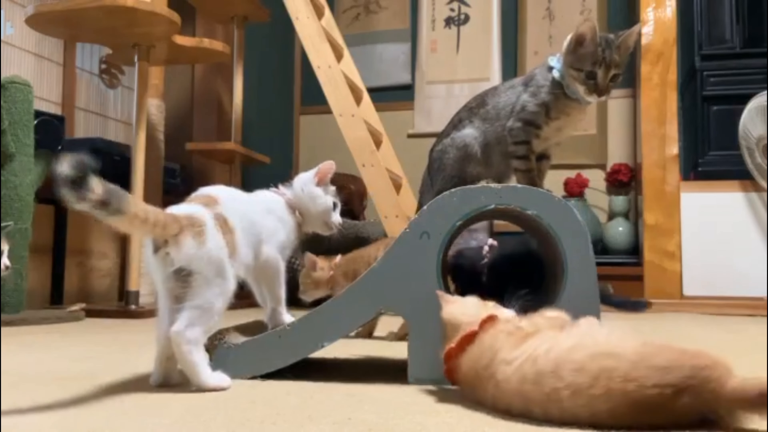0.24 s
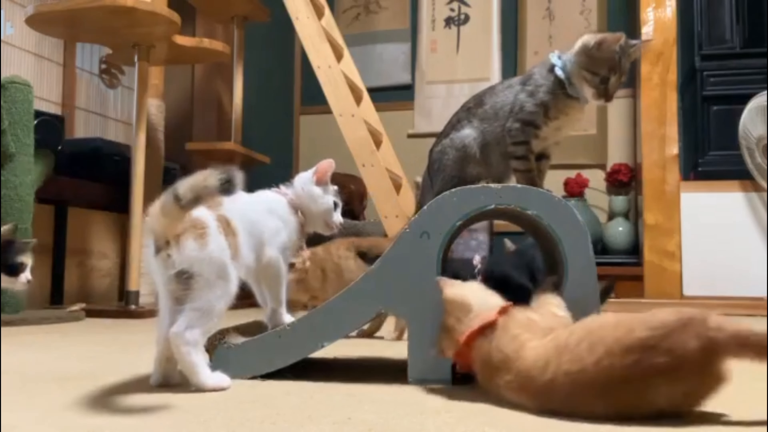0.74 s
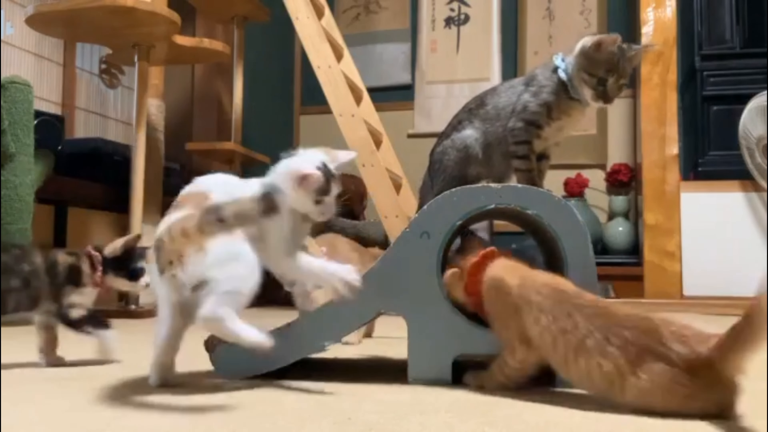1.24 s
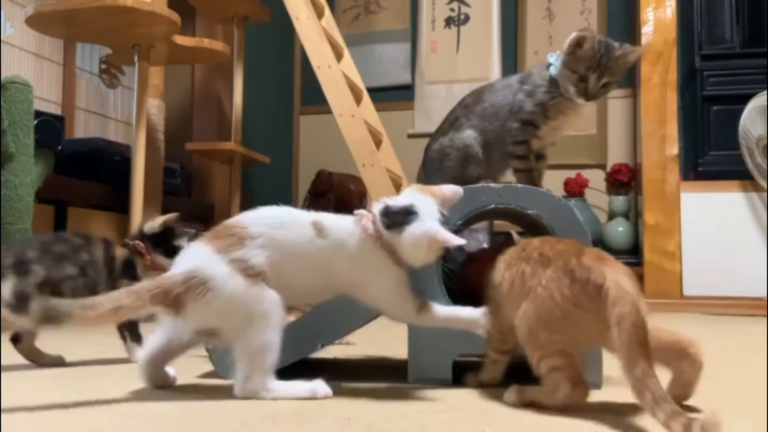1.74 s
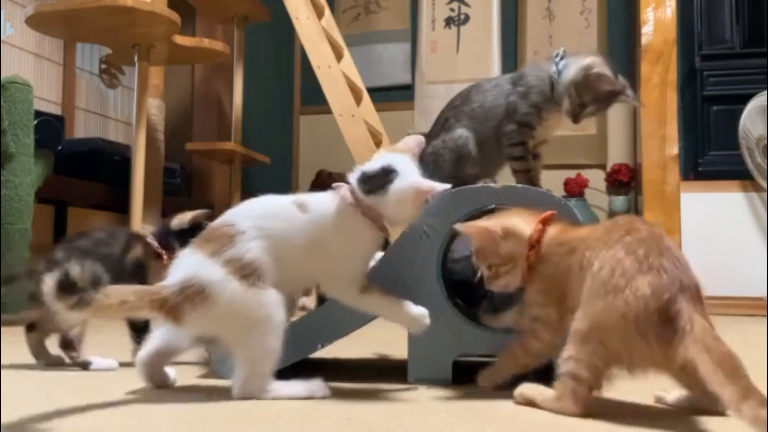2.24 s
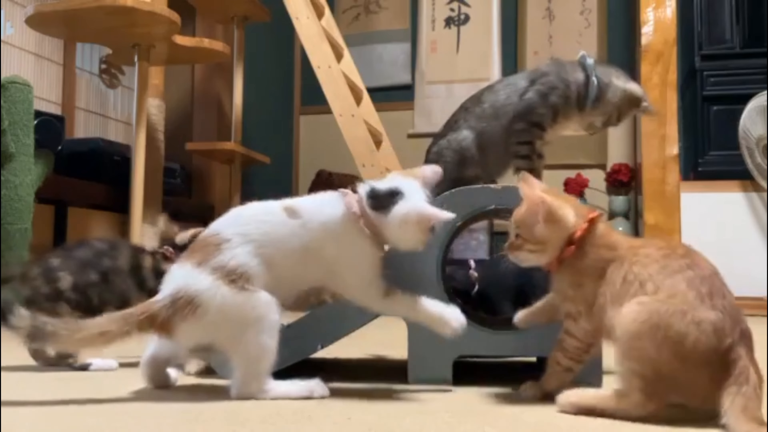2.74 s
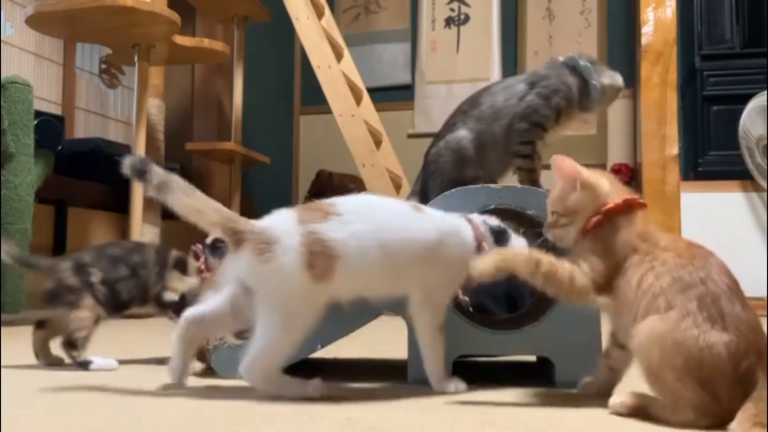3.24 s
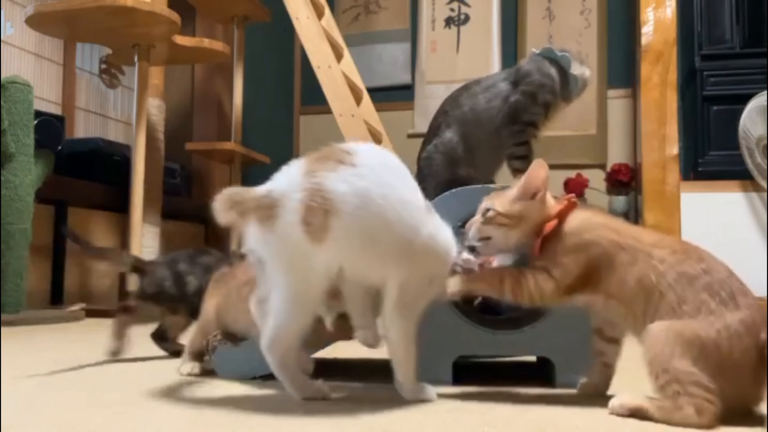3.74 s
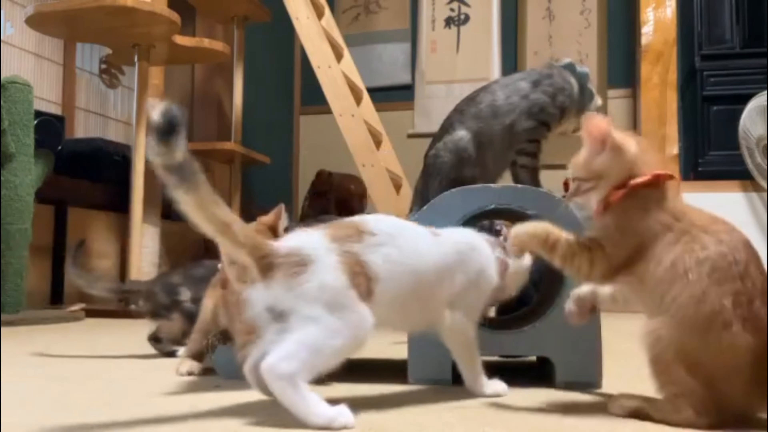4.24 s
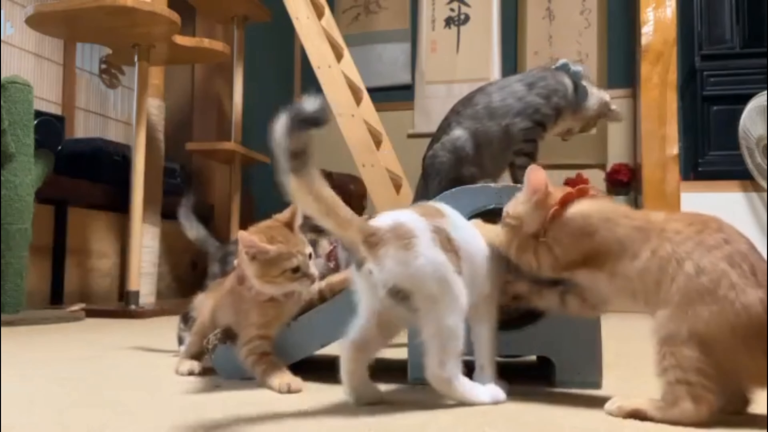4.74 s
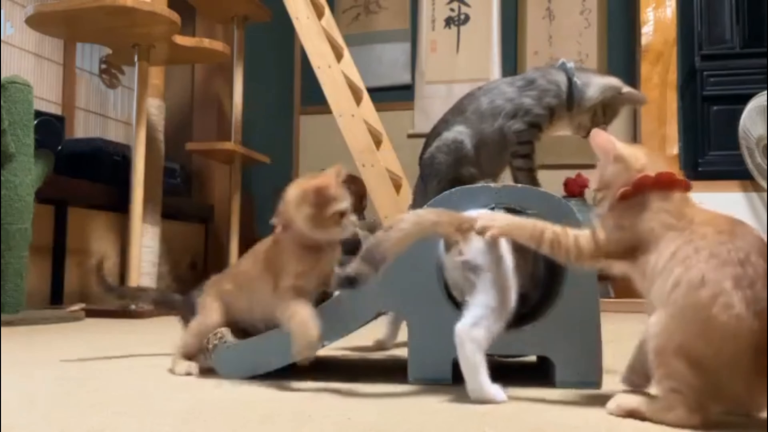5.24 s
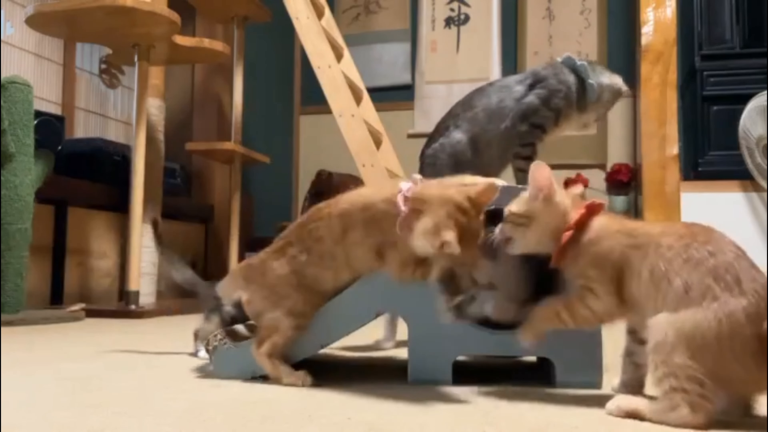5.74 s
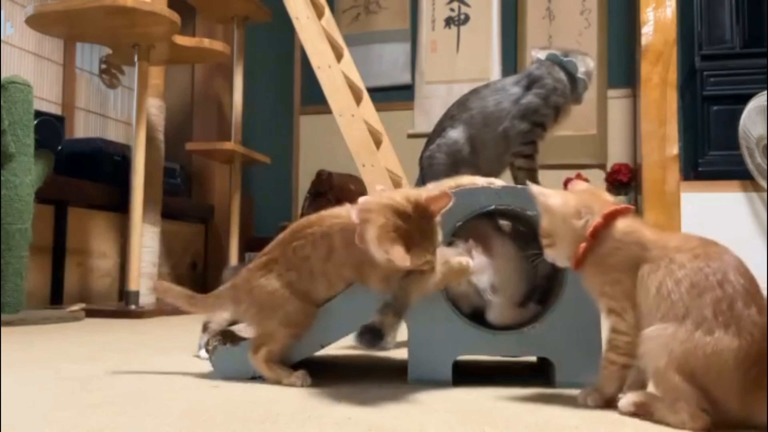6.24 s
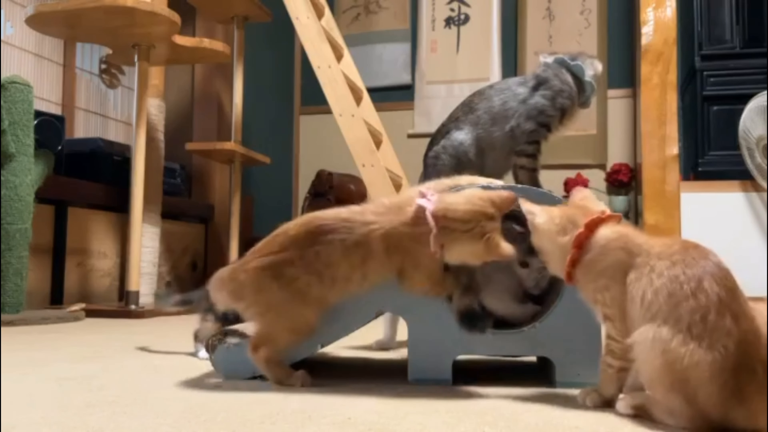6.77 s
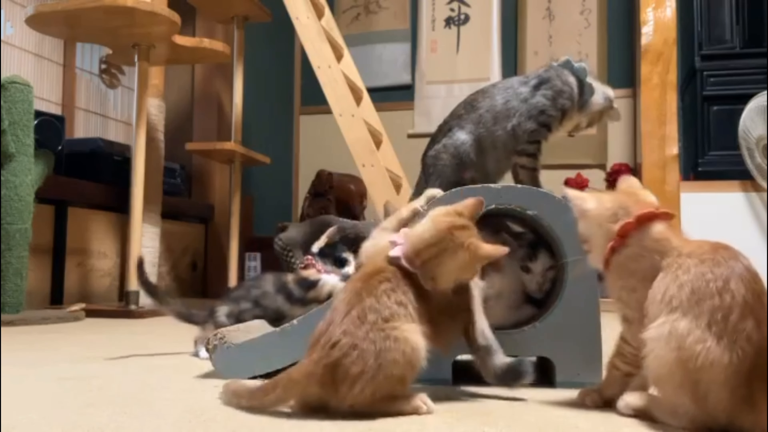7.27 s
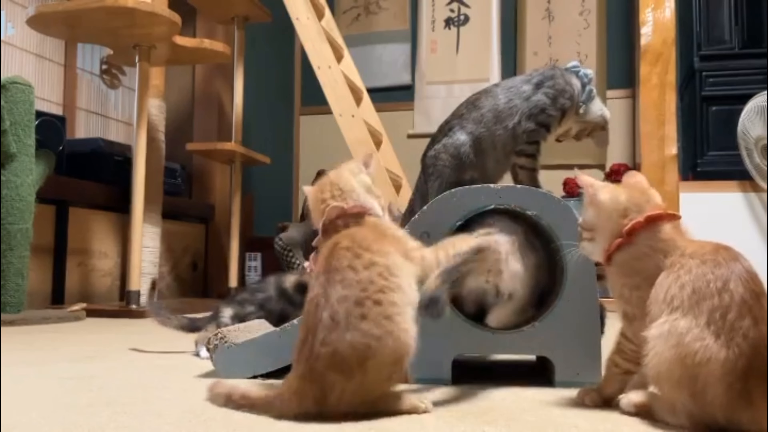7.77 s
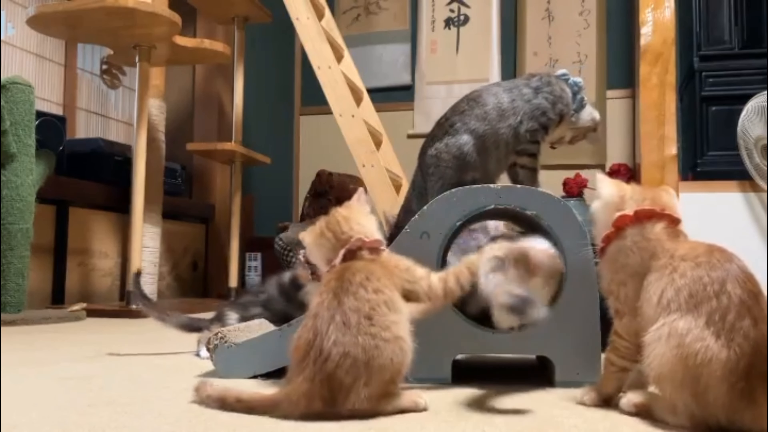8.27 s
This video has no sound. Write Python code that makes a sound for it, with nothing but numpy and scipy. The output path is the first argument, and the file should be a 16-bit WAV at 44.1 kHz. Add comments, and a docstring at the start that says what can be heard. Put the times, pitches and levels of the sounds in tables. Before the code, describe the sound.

In a small, quiet room with a matted floor, kittens tussle around a board tunnel. Light pats quicken into thumps, then a loud dry knock with a claw crack at 1.3 seconds stands far above the rest. Scattered pad thuds, toe raps and brief scuffs follow, busiest again just after five seconds, then thin out to a sharp click at the end. Close single-channel pickup, short room reverberation, faint whir.

```python
"""A small, quiet room with a matted floor: kittens wrestle around a board play tunnel, heard in one channel.
Paws and falling bodies send short falling chirps through the floor; hard knocks ring the damped tunnel board.
Claws crack in shaped noise bursts, toes rap and patter as filtered taps, pads scrape with a hoarse note.
Fur and pads scuff as uneven friction noise. Diffuse reverberation lies below the direct sound,
with a faint steady whir of coloured noise underneath."""
import sys
import numpy as np
from scipy import signal
from scipy.fft import rfft, irfft
from scipy.io import wavfile

SR = 44100
rng = np.random.default_rng(int(sys.argv[2]) if len(sys.argv) > 2 else 0)


def transcribe(u):
    """Save the signal u as a 16-bit wav file named by the first command-line argument.

    u: samples, shape (n,) or (channels, n), limited to [-1, 1]; the rate is SR.
    q: integer samples, one column per channel.
    """
    v = np.clip(np.atleast_2d(u).T, -1, 1)
    q = np.round(v * 32767).astype(np.int16)
    wavfile.write(sys.argv[1], SR, q)


N = 375291  # samples in the scene

# Spectrum of the steady whir: pitch_hz, level_db (relative, per Hz)
WHIR_SPECTRUM = [(35, -53.5), (60, -1), (125, -4.5), (160, 4.5), (205, -9), (500, -13.5), (1100, -24),
                 (1560, -13), (1700, -4), (1830, -14.5), (2050, -12), (3200, -30), (6800, -31.5),
                 (8500, -39.5)]
# Fur brushing along the tunnel in soft swishes: peak_s, length_s, level_db
FUR_SWISHES = [(.05, 0.1, -70.5), (.295, 0.027, -49), (.673, .02, -54.5), (1.06, 0.19, -63),
               (1.325, 0.038, -46), (2.0, 0.21, -69), (3.0, .11, -80.5), (3.36, 0.43, -80),
               (3.59, 0.073, -67), (3.82, 0.059, -65), (4.255, 0.048, -71), (4.52, 0.33, -72),
               (4.84, 0.1, -64.5), (5.36, 0.41, -63.5), (5.88, 0.11, -75.5), (6.14, 0.12, -67.5),
               (6.72, 0.15, -72), (7.215, 0.075, -64.5), (7.45, 0.29, -78), (8.02, 0.57, -75)]
# Scuffing strokes of pads over the mat: peak_s, length_s, level_db
PAD_SCUFFS = [(0.292, 0.1, -57.5), (0.673, 0.022, -55.5), (1.41, 0.069, -50.5), (1.752, 0.025, -57),
              (1.887, 0.077, -58), (2.038, 0.09, -54), (2.347, 0.031, -58), (2.663, 0.05, -50),
              (2.759, 0.051, -61.5), (3.806, 0.054, -62.5), (5.083, 0.13, -53.5), (5.445, 0.17, -52.5),
              (6.771, 0.35, -58), (6.998, 0.096, -59), (7.672, 0.14, -66.5), (8.438, 0.071, -51)]
# Spectrum of fur on board: pitch_hz, level_db
FUR_SPECTRUM = [(2500, -1), (5500, -4), (6700, 1), (8200, -11.5), (13000, -7.5), (16000, -17.5)]
# Spectrum of pads rubbing on the mat: pitch_hz, level_db
RUB_SPECTRUM = [(100, -3), (350, 4), (2400, -1), (3500, -21), (7000, -74)]
# Pads scraping over the board: middle_s, length_s, level_db, pitch_hz
PAD_SCRAPES = [(0.069, 0.038, -60.5, 2300), (1.403, 0.0066, -32, 1366), (1.866, 0.019, -54, 1300),
               (1.992, 0.01, -57.5, 4400), (2.013, 0.008, -54, 2060), (2.343, 0.0073, -56, 1170),
               (4.0, 0.0075, -57, 2120), (4.286, 0.027, -53.5, 1393), (4.746, 0.017, -54.5, 930),
               (6.766, 0.0072, -45, 1890), (7.093, 0.0097, -50.5, 1480), (7.214, 0.028, -49, 1480),
               (8.057, 0.0082, -56.5, 1900), (8.207, 0.019, -52, 1600)]
# Claws catching on the board: start_s, level_db (peak)
CLAW_CATCHES = [(.174, -42.5), (.287, -38), (0.657, -46), (0.681, -39), (1.3056, -18.5), (1.331, -22.5),
                (2.092, -35), (2.648, -46), (3.556, -48.5), (3.96, -47), (4.3929, -28.5), (5.064, -38.5),
                (5.193, -43.5), (5.428, -37.5), (6.336, -45), (6.848, -46), (6.971, -40), (8.452, -28.5),
                (8.487, -43)]
# Spectrum of a claw's crack: pitch_hz, level_db
CLAW_SPECTRUM = [(500, -18), (1500, 6.5), (2500, -2.5), (5000, -3), (6600, -6.5), (8000, -16),
                 (15000, -19.5)]
# Paws landing on the floor, along with the low thud of the big tunnel knock at 1.312 s: attack_s (arrival of
# the chirp's top), level_db (relative), hardness_hz (of the contact)
PAW_LANDINGS = [(0.176, -36, 1690), (0.257, -38.5, 920), (0.284, -42, 398), (0.541, -43.5, 824),
                (0.671, -38, 563), (0.764, -48.5, 400), (1.009, -29, 882), (1.166, -20.5, 935),
                (1.312, -29.5, 328), (1.398, -42, 1220), (1.467, -30, 860), (1.551, -31.5, 1214),
                (2.043, -27.5, 600), (2.615, -42, 670), (2.673, -29.5, 750), (3.235, -36, 760),
                (3.479, -39, 536), (3.678, -37.5, 284), (3.839, -45.5, 420), (4.329, -33, 750),
                (4.395, -31, 1410), (4.61, -41, 1050), (4.825, -35.5, 884), (4.97, -45.5, 507),
                (5.232, -31, 1000), (5.32, -24, 595), (5.355, -30, 946), (5.509, -38.5, 557),
                (6.124, -39.5, 257), (6.34, -41, 618), (6.927, -36, 613), (7.753, -49, 440),
                (7.896, -51.5, 420)]
# Pitches the floor panels favour: pitch_hz, level_db
FLOOR_SPECTRUM = [(90, 5.5), (150, -1.5), (210, -4), (300, 2.5), (400, -1), (650, -2.5), (830, -11),
                  (1300, 1)]
# Ringing modes of the floor: pitch_hz, level_db (relative)
FLOOR_RESONANCES = [(112, -5), (161, -7), (232, 1.5), (380, 1), (530, 0.5), (824, 5)]
# Toes rapping on the tunnel board: start_s, level_db (peak), hardness_hz (of the contact)
TOE_RAPS = [(.332, -41, 2110), (.369, -36, 3150), (1.286, -39.5, 2340), (1.559, -31, 2730),
            (1.952, -37, 2250), (2.029, -37.5, 2950), (2.063, -28, 2400), (2.321, -44, 2430),
            (2.358, -40, 2460), (2.683, -35, 2810), (4.685, -48.5, 2660), (5.029, -29.5, 2580),
            (5.137, -48, 2320), (5.352, -29, 2350), (5.433, -26, 2500), (5.536, -36.5, 1940),
            (6.337, -39, 4160), (6.346, -38, 3900), (6.814, -38, 3030), (6.849, -34.5, 2980),
            (6.971, -34, 2240), (7.752, -47.5, 2200), (7.949, -46.5, 2150)]
# A kitten's whole weight dropping on the floor: attack_s (arrival of the chirp's top), level_db (relative)
BODY_FALLS = [(1.184, -44), (2.117, -49), (2.563, -44.5), (3.855, -45), (5.446, -46), (5.535, -38),
              (6.929, -33.5), (7.764, -53.5), (8.41, -52.5)]
# Hard knocks on the tunnel: start_s, level_db, hardness_hz (of the contact)
TUNNEL_KNOCKS = [(1.3085, -6.2, 2600), (1.3343, -31, 4500), (8.4525, -37, 9000)]
# Modes of the tunnel board: pitch_hz, level_db, t60_s
TUNNEL_MODES = [(829, -13, .026), (1270, 0, .011), (1500, -1.5, .008), (1950, -13, .008),
                (2580, -6.5, .008), (3900, -18, .009), (6510, -14, .011)]
# Dying time of the room: pitch_hz, t60_s
ROOM_DECAY = [(80, .58), (1200, .52), (2500, .42), (14000, .35)]
# Reverberation against the direct sound: pitch_hz, level_db
ROOM_LEVEL = [(70, -4), (300, -8), (1300, -17), (2300, -12), (7000, -4.5)]

WHIR_DB = -63.5  # RMS
FUR_UNDER_PADS_DB = -7.5  # fur against pads in a scuffing stroke
SCRAPE_Q, SCRAPE_NOTE_DB = 19, -7.5  # sharpness of the note; its level against the rasp
BLOW_SIZE = 16384  # samples that hold one blow
TRAVEL_MS = 6.55  # travel of a 1 kHz bending wave through the floor, for paws
# Slope of a pad's spectrum below its hardness: dB per octave up to a hardness of 1 kHz,
# then the slope lost per octave of extra hardness, so that a hard pad gives a broader tap
PAD_SLOPE_DB, PAD_BROADENING_DB = 6, 6.5
ROLL_S, ROLL_DB = 0.004526, -1.5  # toes follow the pad about this much later, and lighter
# A body's hardness at a reference level; it rises one octave per this many dB
THUMP_HZ, THUMP_AT_DB, THUMP_DB_PER_OCTAVE = 264, -35.5, 13
THUMP_SLOPE_DB = -3.5  # per octave
CUTOFF_HZ = 15900  # upper edge of everything heard


def from_db(db):
    """Turn decibels into an amplitude."""
    return 10 ** (np.asarray(db) / 20)


def rms_one(x):
    """Scale a sound to an RMS of 1."""
    return x / np.sqrt(np.mean(x ** 2) + 1e-20)


def at_hz(points, hz):
    """Read a table on a log-frequency axis."""
    table = np.array(points)
    return np.interp(np.log(np.maximum(hz, 1)), np.log(table[:, 0]), table[:, 1])


def coloured(x, spectrum):
    """Give a sound a smooth spectrum."""
    hz = np.fft.rfftfreq(len(x), 1 / SR)
    return irfft(rfft(x) * from_db(at_hz(spectrum, hz)), len(x))


def octave_weight(hz, centre):
    """Triangle over one octave to either side of a centre."""
    return np.maximum(1 - np.abs(np.log2(hz / centre)), 0)


def add(out, sound, start_s):
    """Mix a sound in at a time, trimmed to the scene."""
    i = int(round(start_s * SR))
    sound, i = sound[max(-i, 0):], max(i, 0)
    out[i:i + len(sound)] += sound[:max(N - i, 0)]


def dying_noise(t60, size):
    """Noise of unit energy that dies away."""
    noise = rng.standard_normal(size) * from_db(-60 * np.arange(size) / SR / t60)
    return noise / np.linalg.norm(noise)


def drift(rate_hz):
    """Slow random wandering with an RMS of 1."""
    knots = rng.standard_normal(int(rate_hz * N / SR) + 2)
    return rms_one(np.interp(np.arange(N) / SR * rate_hz, np.arange(len(knots)), knots))


def whir():
    """A faint whir: steady noise with a fixed spectrum."""
    return from_db(WHIR_DB) * rms_one(coloured(rng.standard_normal(N), WHIR_SPECTRUM))


def strokes(rows, rise_share=0.58):
    """Strength over time of strokes that swell quickly and fade more slowly."""
    t = np.arange(N) / SR
    strength = np.zeros(N)
    for peak, length, db in rows:
        distance = (t - peak) / length / np.where(t < peak, rise_share, 1)
        strength += from_db(db) * np.exp(-np.minimum(2 * distance ** 2, 20))
    return strength


def friction(spectrum, smooth):
    """Tiny slips of uneven size over a smooth hiss; each slip and each octave has its own strength."""
    hz, out = np.maximum(np.fft.rfftfreq(N, 1 / SR), 1), 0
    slipping = rng.random(N) < 200 / SR  # about 200 slips a second
    pressure = drift(70)  # shared by all octaves
    for centre in 250 * 2 ** np.arange(7):
        slips = rms_one(slipping * rng.standard_normal(N))
        strength = from_db(2.5 * (pressure + drift(60)))
        grain = (slips + smooth * rng.standard_normal(N)) * strength
        out = out + rfft(grain) * np.sqrt(octave_weight(hz, centre))
    return rms_one(coloured(irfft(out, N), spectrum))


def scuffling(idle_fur_db=-87, idle_swing_db=6.5):
    """Pads drag over the mat with a coarse rub while fur brushes the board; the fur never quite rests."""
    pads = strokes(PAD_SCUFFS)
    idle_fur = from_db(idle_fur_db + idle_swing_db * drift(24))
    fur = np.hypot(strokes(FUR_SWISHES), from_db(FUR_UNDER_PADS_DB) * pads) + idle_fur
    return pads * friction(RUB_SPECTRUM, smooth=0.99) + fur * friction(FUR_SPECTRUM, smooth=1.9)


def board_band(x, top_hz, bottom_share):
    """A light touch on the board sounds a band of two or three octaves under a steep upper edge."""
    x = signal.sosfilt(signal.butter(6, top_hz, fs=SR, output="sos"), x)
    return signal.sosfilt(signal.butter(2, top_hz * bottom_share, "high", fs=SR, output="sos"), x)


def scrapes(top_over_note=1.314, bottom_share=0.16, grain_db=3, size=BLOW_SIZE):
    """A pad sticks and slips over the board: a short grainy rasp around a hoarse note."""
    out, t = np.zeros(N), (np.arange(size) - size / 2) / SR
    for middle, length, db, hz in PAD_SCRAPES:
        swell = np.exp(-(t / length) ** 2)
        grain = np.repeat(rng.standard_normal(size // 64), 64)  # a new strength every 64 samples
        slips = rng.standard_normal(size) * swell * from_db(grain_db * grain)
        rasp = board_band(slips, top_over_note * hz, bottom_share)
        note = signal.lfilter(*signal.iirpeak(hz, SCRAPE_Q, fs=SR), rasp)
        sound = rms_one(rasp) + from_db(SCRAPE_NOTE_DB) * rms_one(note)
        swell_rms = np.sqrt(np.mean(swell ** 2))
        add(out, from_db(db) * rms_one(sound) * swell_rms, middle + t[0])
    return out


def claws(t60=0.03, size=BLOW_SIZE):
    """A claw catches and lets go in a bright, toneless crack of a few milliseconds."""
    out = np.zeros(N)
    for s, db in CLAW_CATCHES:
        burst = rfft(dying_noise(t60, size))
        flat_burst = irfft(burst / np.abs(burst))  # every frequency equally strong
        crack = coloured(flat_burst, CLAW_SPECTRUM)[:size // 2]
        add(out, from_db(db) * crack / np.abs(crack).max(), s)
    return out


def floor_ring(hz, sharpness=18, ring_db=-4, spread_db=4, detune=0.035):
    """Response of the floor's modes, the high ones dying first; each blow favours and shifts them anew."""
    response = 0
    chances = rng.standard_normal((len(FLOOR_RESONANCES), 2))
    for (mode_hz, db), (force, shift) in zip(FLOOR_RESONANCES, chances):
        offset = hz / (mode_hz * np.exp(detune * shift)) - 1
        strength = from_db(db + ring_db + spread_db * force)
        response = response + strength / (1 + 2j * sharpness * offset)
    return 2 * response


def footfall(hard_hz, slope_db, travel_ms, toes=0.8, toes_t60=0.033, scatter=0.82, scatter_t60=0.17,
             lowest_hz=60, sway_db=-22, sway_hz=100, size=BLOW_SIZE):
    """One soft blow spread into a falling chirp, peak about 1, with its attack at the middle of its buffer."""
    hz = np.maximum(np.fft.rfftfreq(size, 1 / SR), 1)
    # a soft pad excites little above its hardness; the floor radiates no deep bass
    contact = from_db(slope_db * np.log2(hz / hard_hz)) / np.sqrt(1 + (hz / hard_hz) ** 10)
    radiation = 1 / np.sqrt(1 + (lowest_hz / hz) ** 10)
    # the kitten's weight also sets the whole floor swaying
    sway = from_db(sway_db) * np.max(contact * radiation) / (1 + (hz / sway_hz) ** 2)
    # bending waves travel as the root of frequency: the highs arrive first
    bending_hz = np.minimum(hz, hard_hz)
    root_cycles = 2 * np.sqrt(1000 * bending_hz) - bending_hz * np.sqrt(1000 / hard_hz)
    cycles = travel_ms / 1000 * root_cycles
    wave = (contact + sway) * radiation * np.exp(-2j * np.pi * cycles)
    # toes and pad touch down one after another, which roughens the top of the blow
    roughness = toes * rfft(dying_noise(toes_t60, size)) * hz / (hz + hard_hz / 4)
    # joists and mat edges scatter the wave into a short tail; the blow keeps its energy
    tail = scatter * rfft(dying_noise(scatter_t60, size))
    rough = wave * (1 + floor_ring(hz) + roughness + tail)
    rough = rough * np.linalg.norm(wave) / np.linalg.norm(rough)
    return np.roll(irfft(rough), size // 2) / np.abs(irfft(wave)).max()


def paws(level_db=3.0, roll_spread=0.35):
    """Pad and toes of every landing each send a chirp through the floor, whose panels favour a few pitches."""
    out = np.zeros(N)
    for attack, db, hard_hz in PAW_LANDINGS:
        slope_db = min(PAD_SLOPE_DB - PAD_BROADENING_DB * np.log2(hard_hz / 1000), PAD_SLOPE_DB)
        pad = footfall(hard_hz, slope_db, TRAVEL_MS)
        toes = footfall(hard_hz, slope_db, TRAVEL_MS)
        start = attack - len(pad) / 2 / SR
        roll = ROLL_S * (1 + roll_spread * rng.uniform(-1, 1))
        add(out, from_db(db + level_db) * pad, start)
        add(out, from_db(db + level_db + ROLL_DB) * toes, start + roll)
    return coloured(out, FLOOR_SPECTRUM)


def tap(hard_hz, t60, bottom_share=0.11, tilt_hz=1500):
    """One toe on the board: a dry, brief tap of peak 1 from filtered dying noise."""
    burst = signal.lfilter(*signal.butter(1, tilt_hz, fs=SR), dying_noise(t60, BLOW_SIZE))
    sound = board_band(burst, hard_hz, bottom_share)
    return sound / np.abs(sound).max()


def patter(over_stroke_db=5.0, spread_db=5, hard_hz=1800, t60=0.022, count=12):
    """Scrabbling toes tick at random around each scuffing stroke, and share its strength."""
    out = np.zeros(N)
    for peak, length, db in PAD_SCUFFS:
        for when, force, hardness in rng.uniform(-0.83, 1, (count, 3)):
            tick = tap(hard_hz * 2 ** hardness, t60)
            start = peak + length * max(when, when / 2)  # ticks before the peak crowd closer to it
            add(out, from_db(db + over_stroke_db + spread_db * force) * tick, start)
    return out


def raps(t60=0.042):
    """Toes rap on the tunnel board, each a dry tap as bright as its contact is hard."""
    out = np.zeros(N)
    for s, db, hard_hz in TOE_RAPS:
        add(out, from_db(db) * tap(hard_hz, t60), s)
    return out


def bodies(level_db=1.5, travel_ms=7.75):
    """A falling body pushes the floor into a deep, slow chirp; a heavier fall is harder."""
    out = np.zeros(N)
    for attack, db in BODY_FALLS:
        hard_hz = THUMP_HZ * 2 ** ((db - THUMP_AT_DB) / THUMP_DB_PER_OCTAVE)
        thud = footfall(hard_hz, THUMP_SLOPE_DB, travel_ms)
        add(out, from_db(db + level_db) * thud, attack - len(thud) / 2 / SR)
    return coloured(out, FLOOR_SPECTRUM)


def tunnel(lowest_hz=620, size=BLOW_SIZE):
    """Hard knocks ring the heavily damped board, which is too small to radiate bass."""
    out, t = np.zeros(N), np.arange(size) / SR
    ring = np.zeros(size)
    for hz, db, t60 in TUNNEL_MODES:
        ring += from_db(db - 60 * t / t60) * np.sin(2 * np.pi * hz * t)
    ring = signal.lfilter(*signal.butter(2, lowest_hz, "high", fs=SR), ring)
    for s, db, hard_hz in TUNNEL_KNOCKS:
        contact = signal.butter(1, hard_hz, fs=SR)  # a softer contact dulls the ring
        add(out, from_db(db) * signal.lfilter(*contact, ring), s)
    return out


def room(x, first_echo_s=0.0029, size=32768):
    """Diffuse reflections as dying noise, each octave fading at its own rate."""
    hz, t = np.maximum(np.fft.rfftfreq(size, 1 / SR), 1), np.arange(size) / SR
    white, response = rfft(rng.standard_normal(size)), 0
    onset = np.clip(t / first_echo_s - 1, 0, 1)  # silent until the first echo, then rising
    for centre in 62.5 * 2 ** np.arange(9):
        band = irfft(white * octave_weight(hz, centre))
        decay = from_db(-60 * t / at_hz(ROOM_DECAY, centre)) * onset
        level = from_db(at_hz(ROOM_LEVEL, centre))
        response = response + band * decay / np.linalg.norm(decay) * level
    return signal.fftconvolve(x, response)[:N]


def scene():
    """The play, its reverberation and the steady whir, in one channel."""
    play = scuffling() + scrapes() + claws() + paws() + patter() + raps() + bodies() + tunnel()
    return (play + room(play) + whir())[None]


def record(dry):
    """A steep low-pass filter ends the treble at the cutoff."""
    return signal.sosfilt(signal.ellip(10, .2, 80, CUTOFF_HZ, fs=SR, output="sos"), dry)


dry = scene()
out = record(dry)
transcribe(out)
```